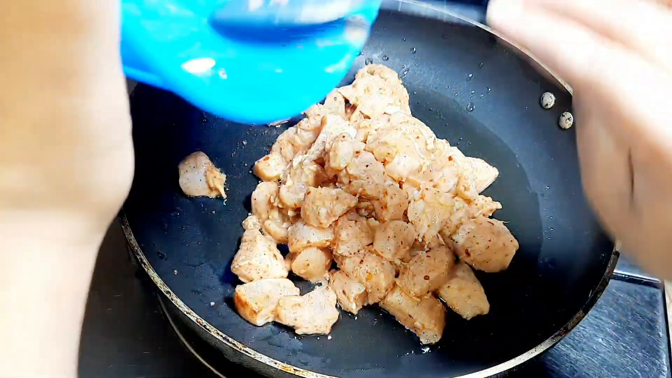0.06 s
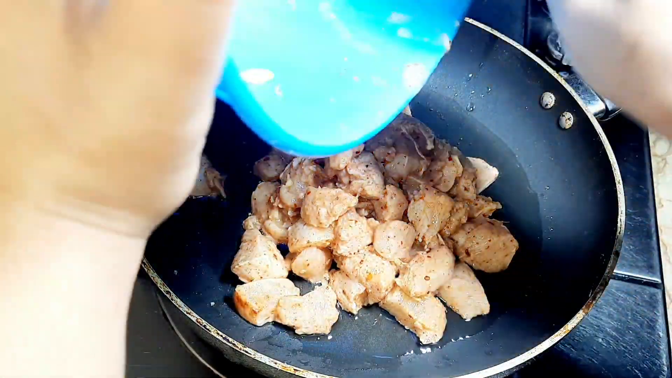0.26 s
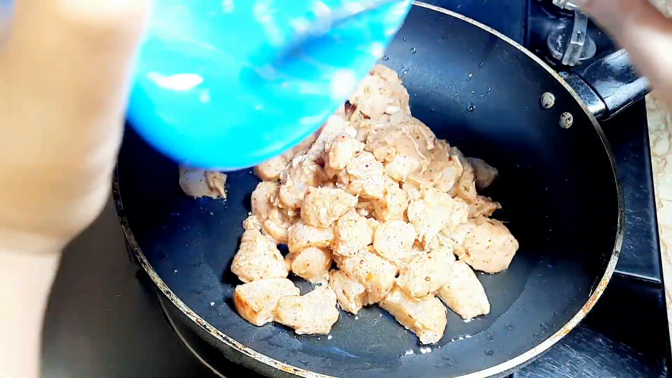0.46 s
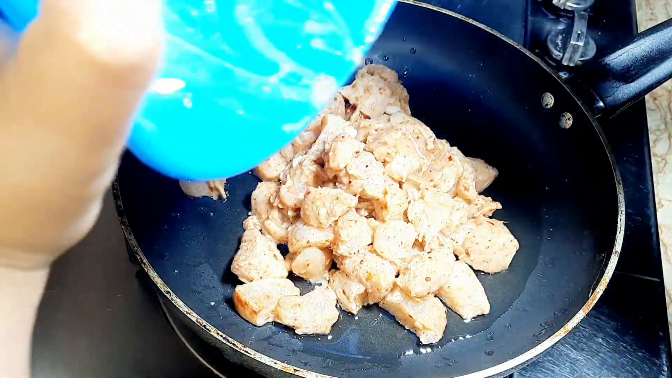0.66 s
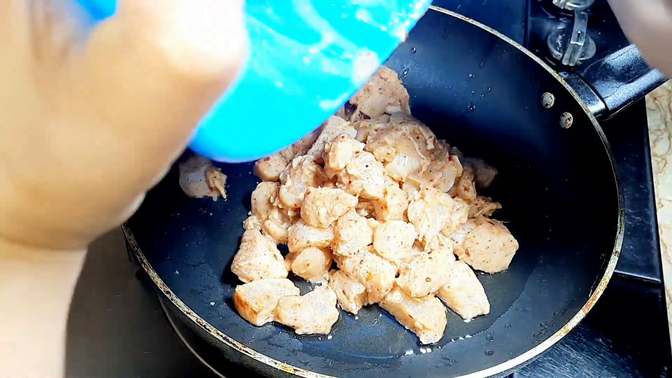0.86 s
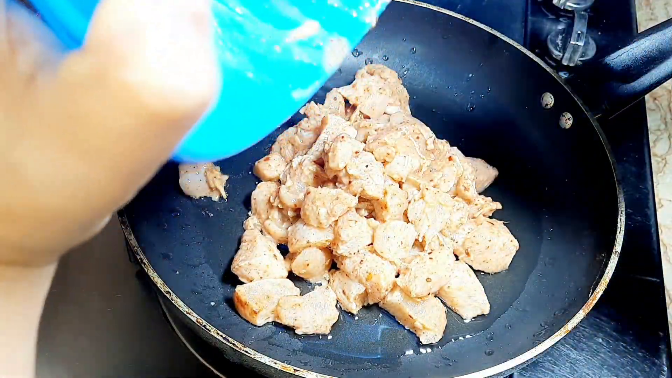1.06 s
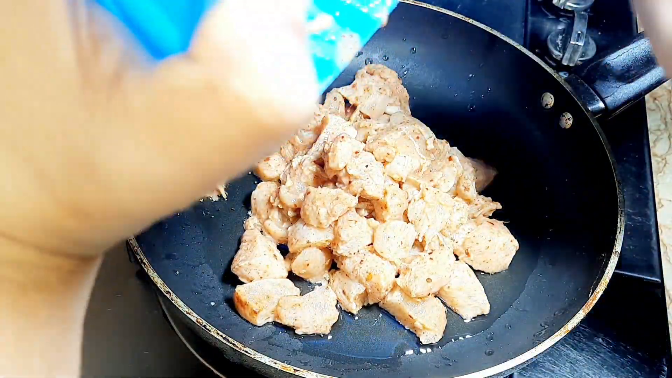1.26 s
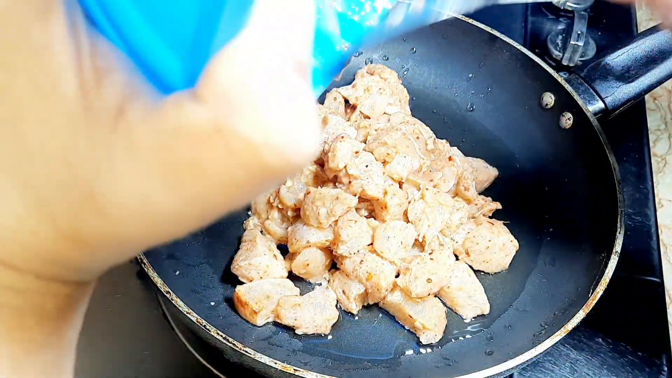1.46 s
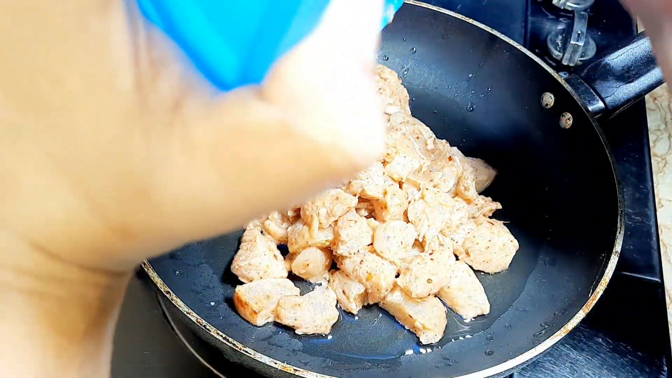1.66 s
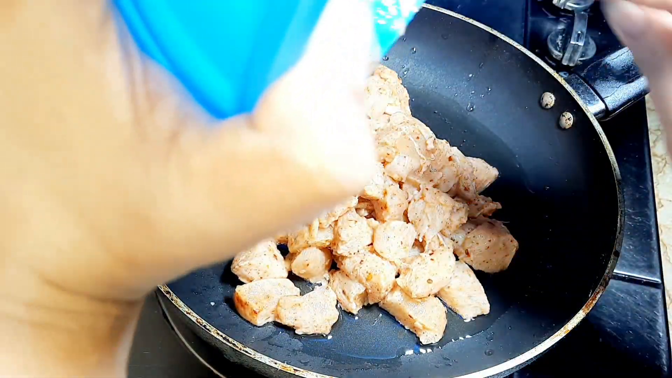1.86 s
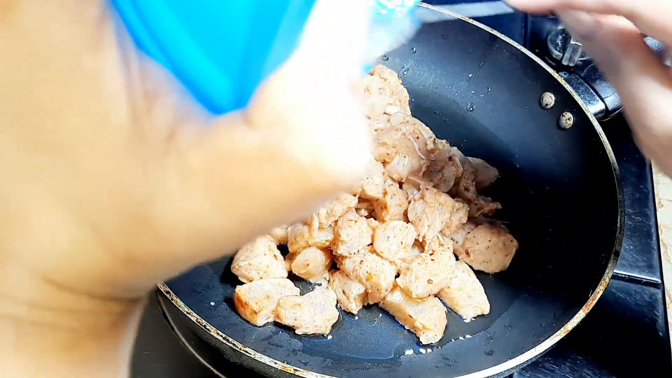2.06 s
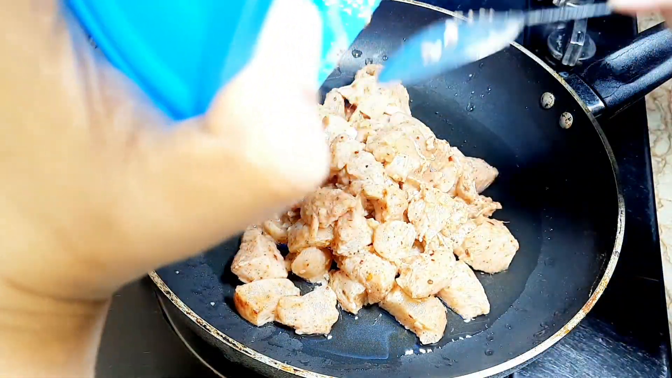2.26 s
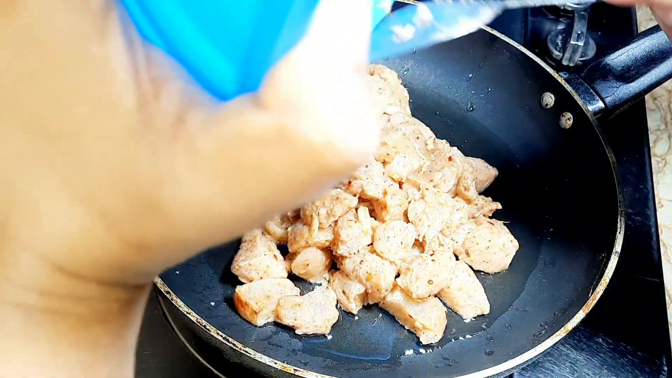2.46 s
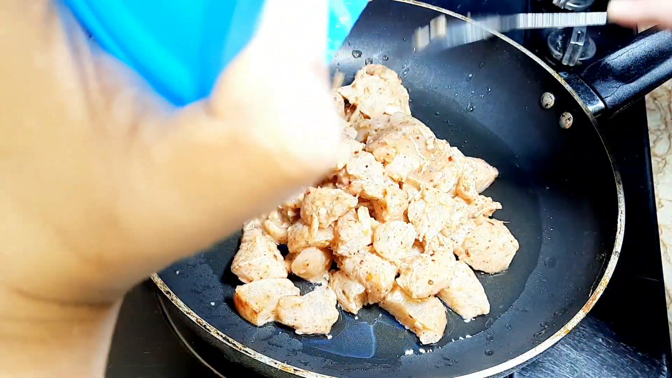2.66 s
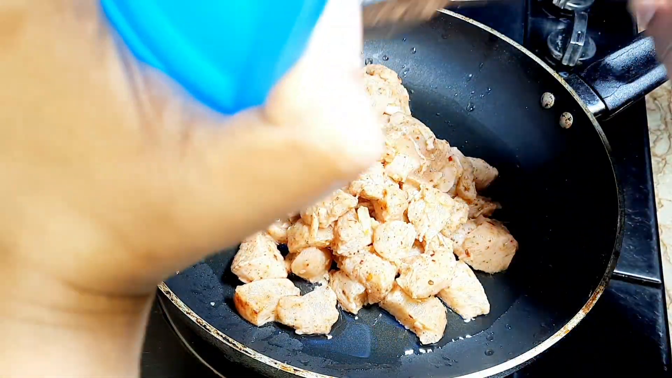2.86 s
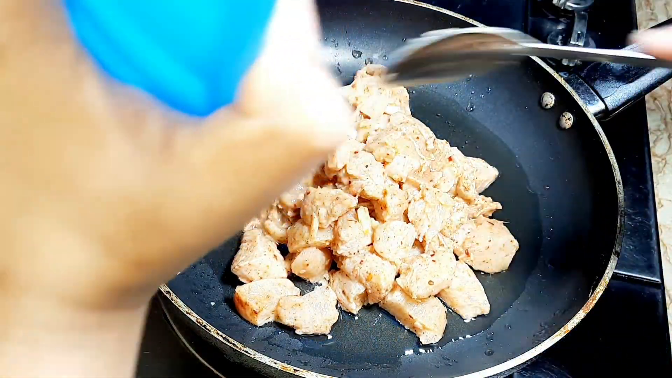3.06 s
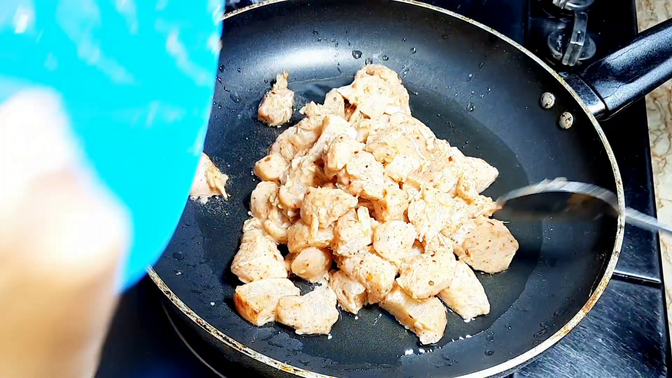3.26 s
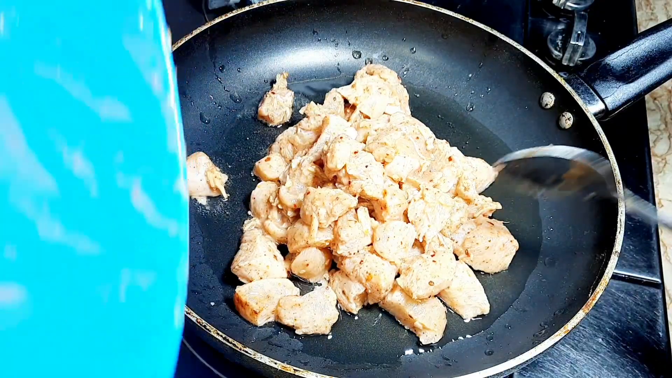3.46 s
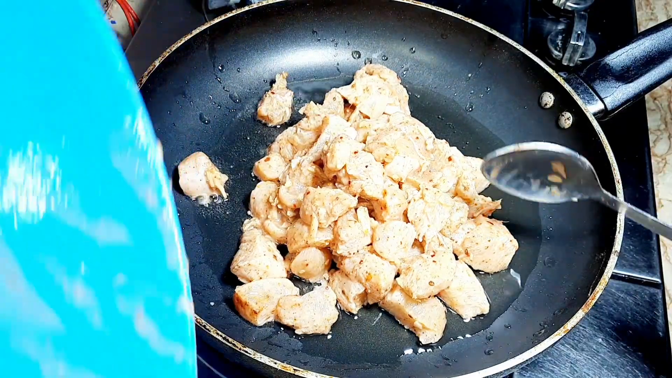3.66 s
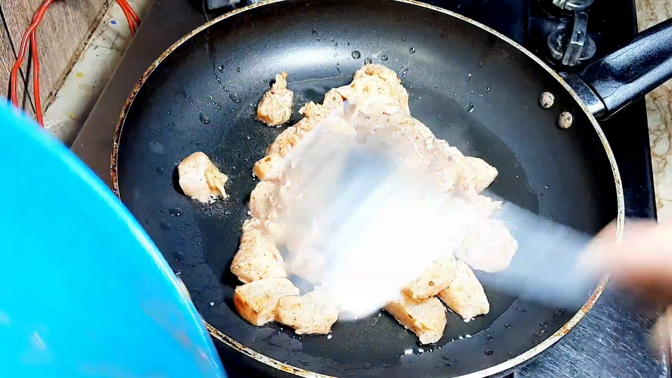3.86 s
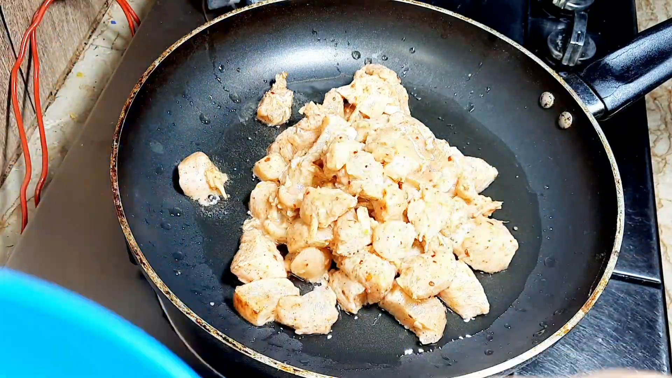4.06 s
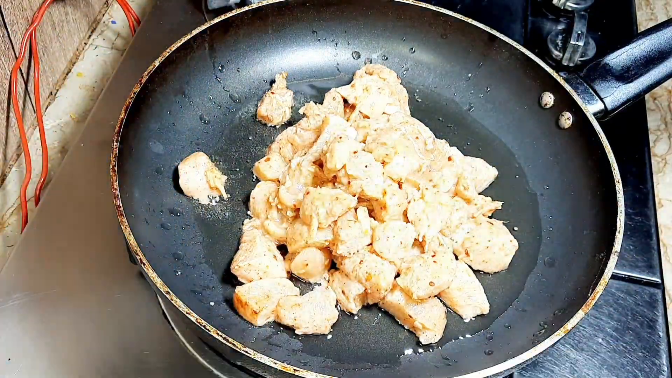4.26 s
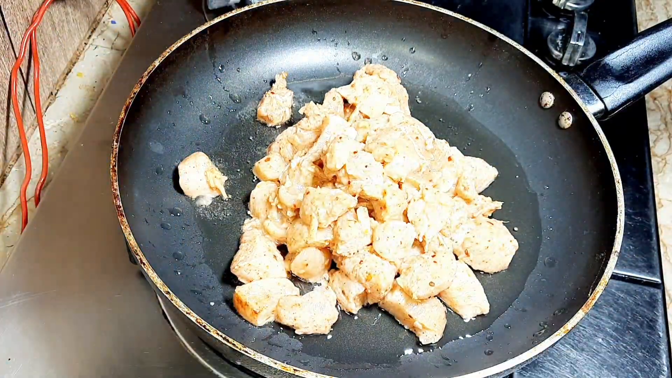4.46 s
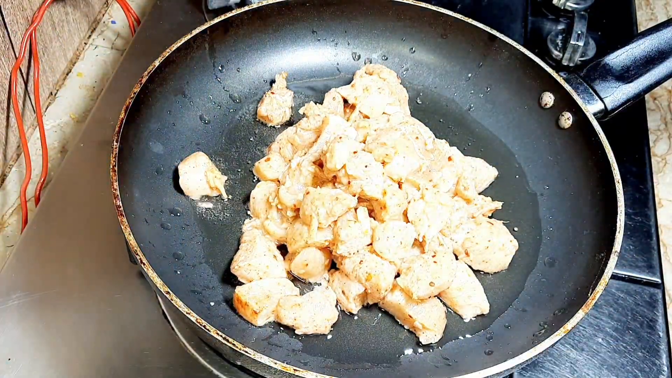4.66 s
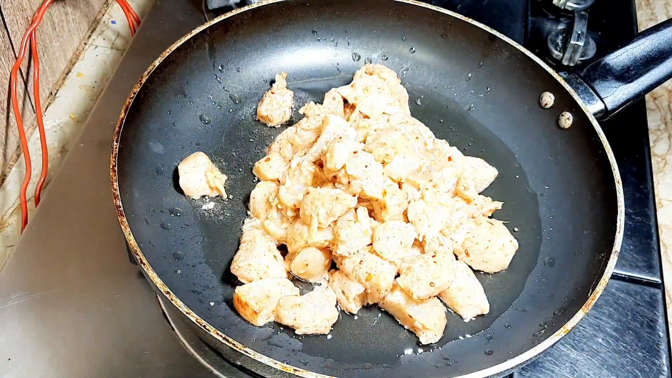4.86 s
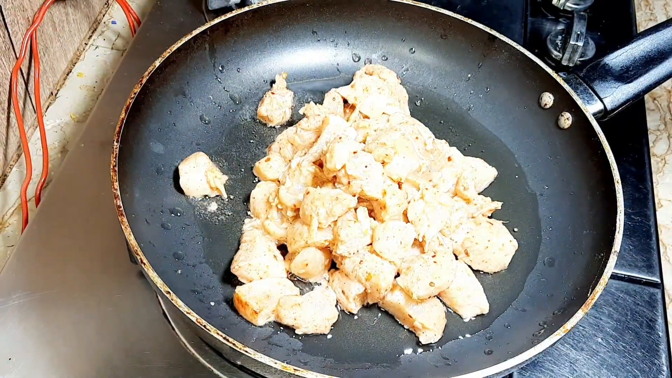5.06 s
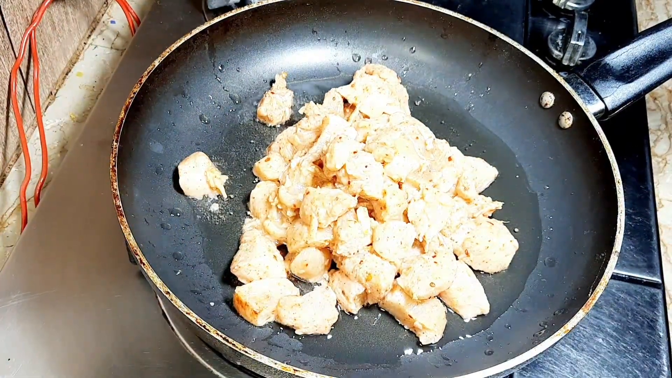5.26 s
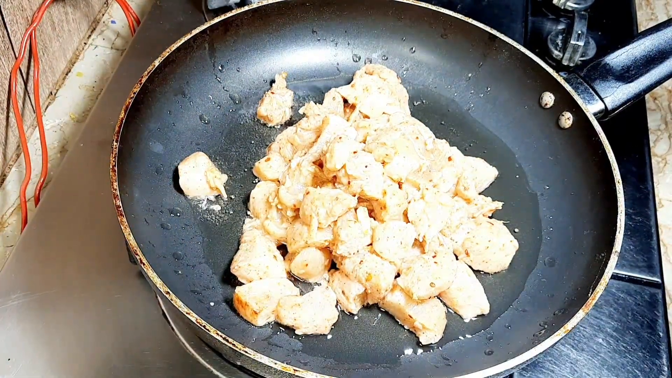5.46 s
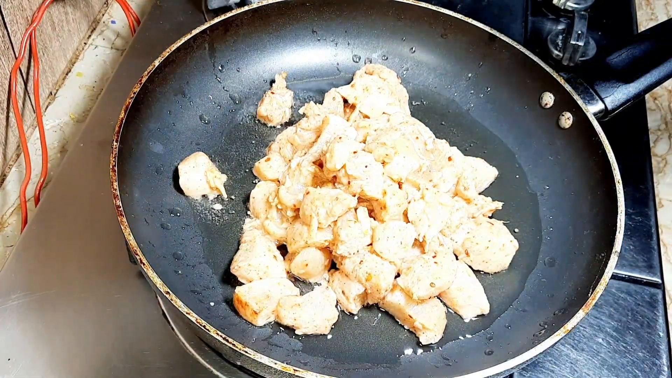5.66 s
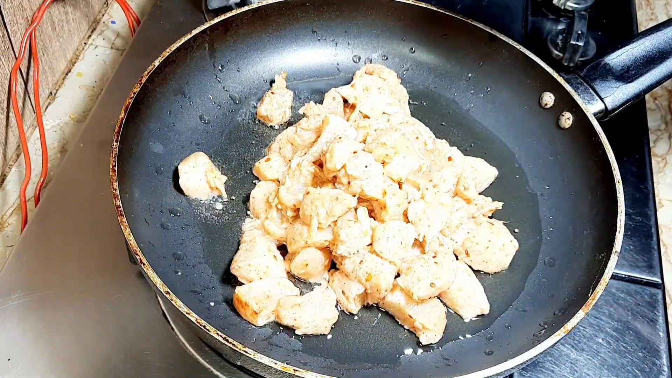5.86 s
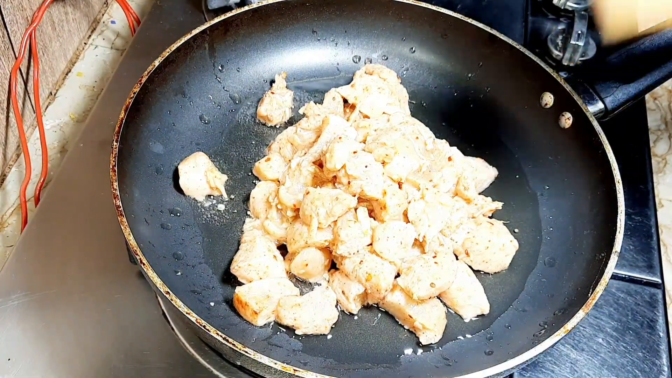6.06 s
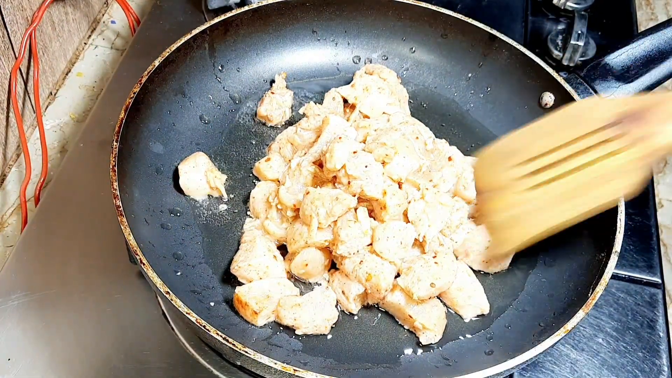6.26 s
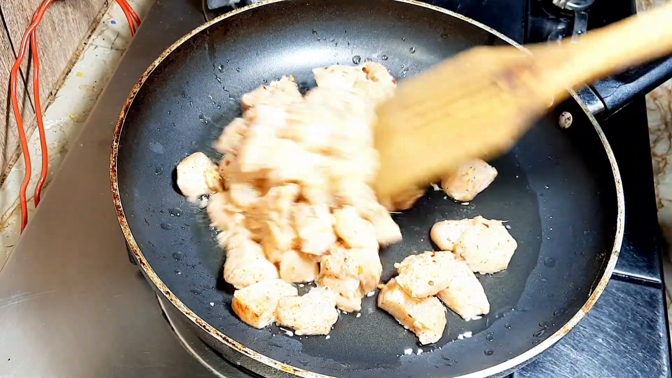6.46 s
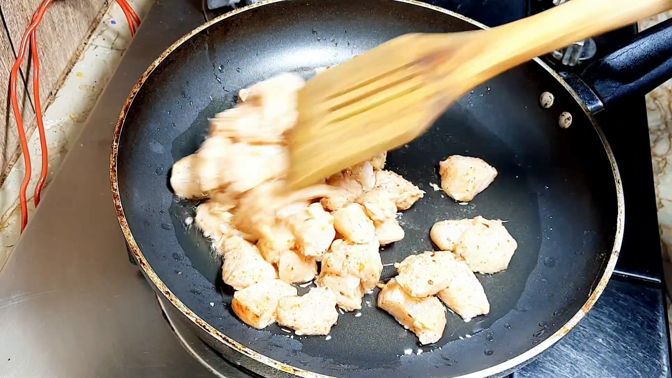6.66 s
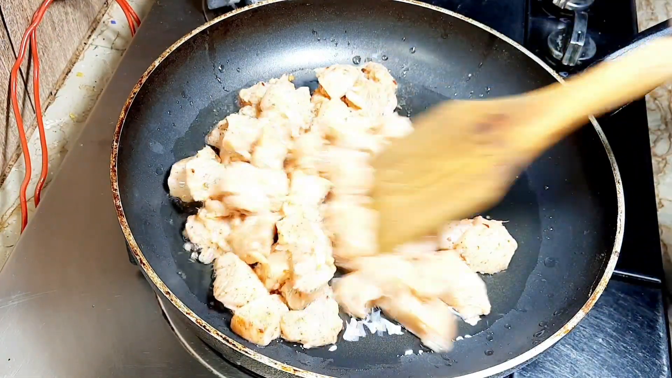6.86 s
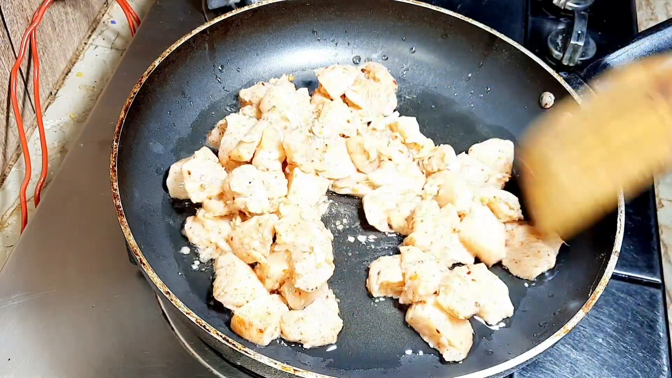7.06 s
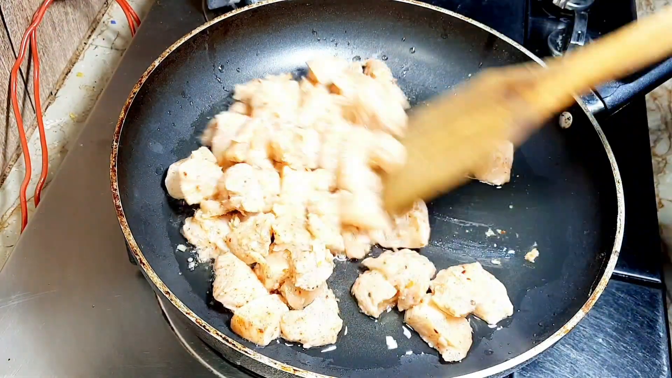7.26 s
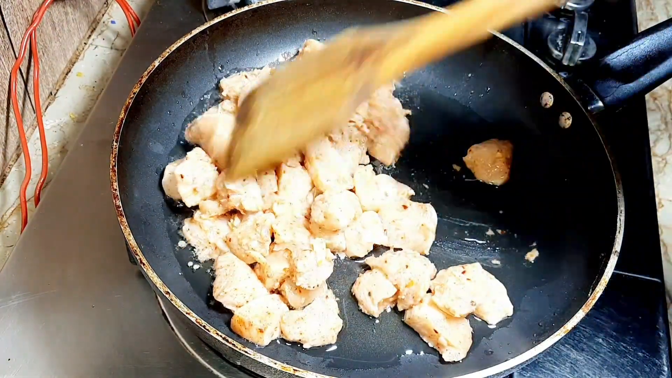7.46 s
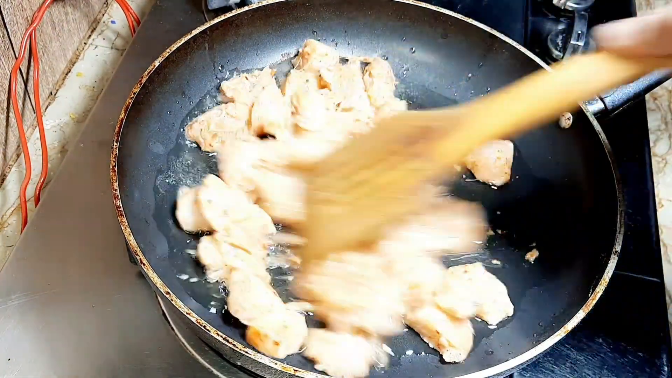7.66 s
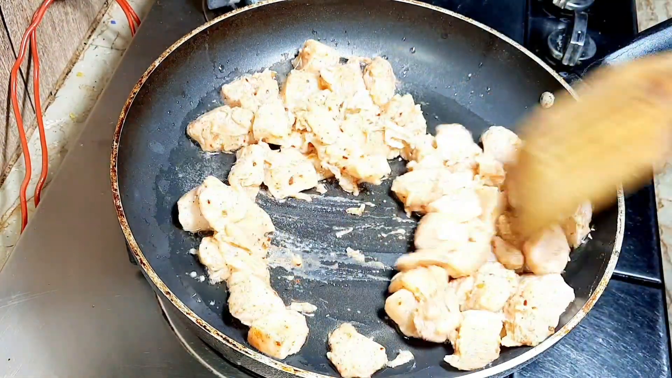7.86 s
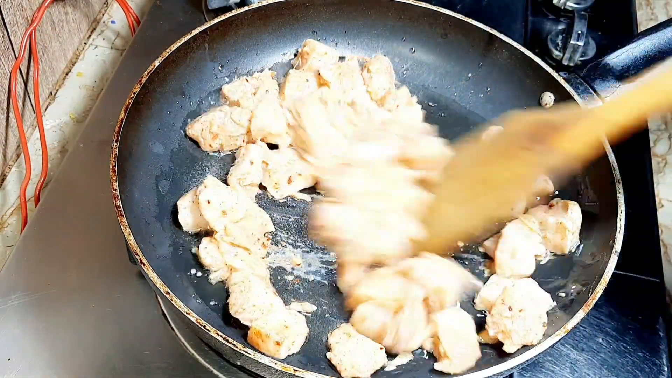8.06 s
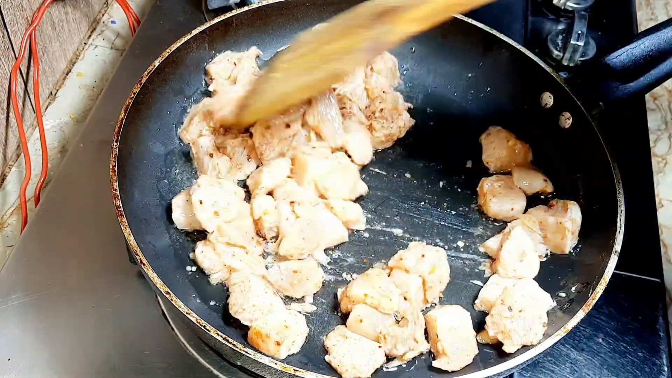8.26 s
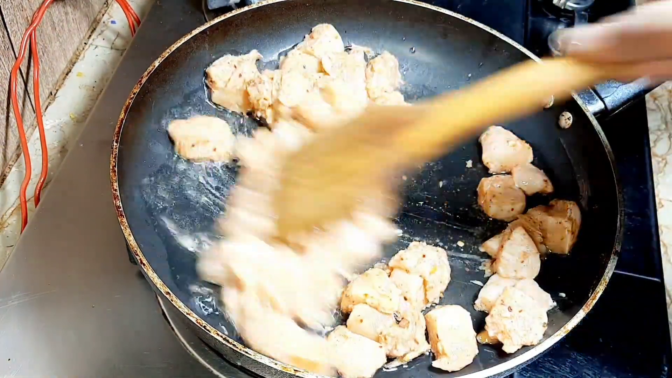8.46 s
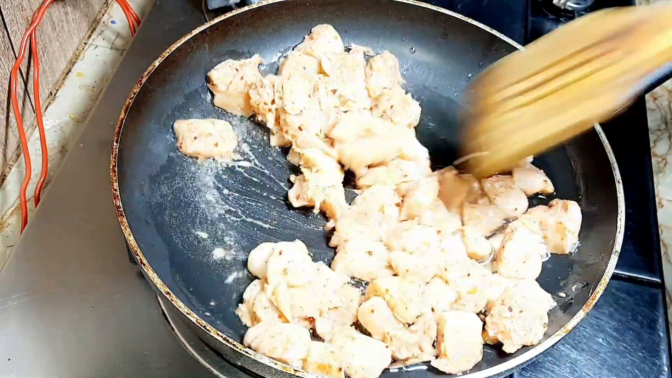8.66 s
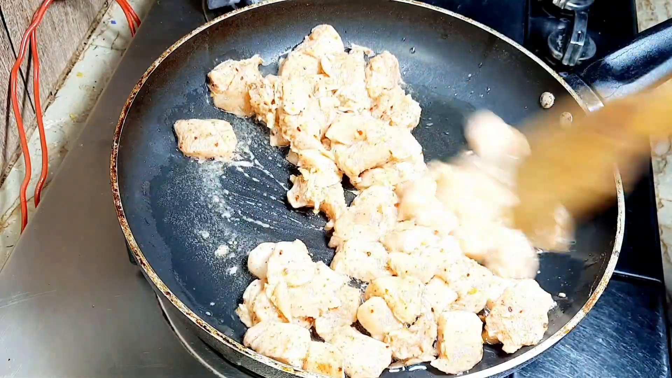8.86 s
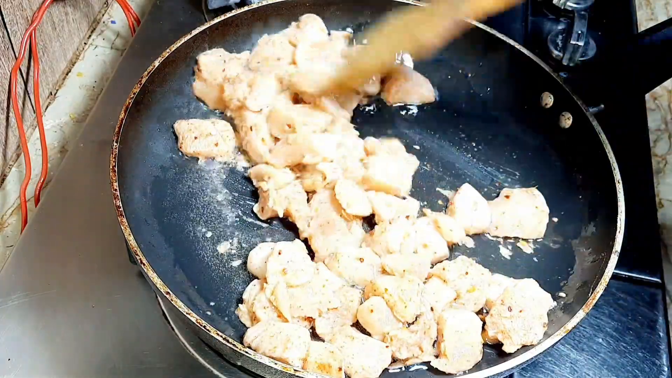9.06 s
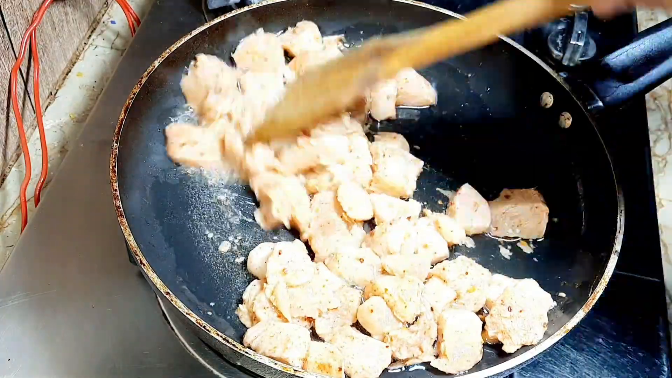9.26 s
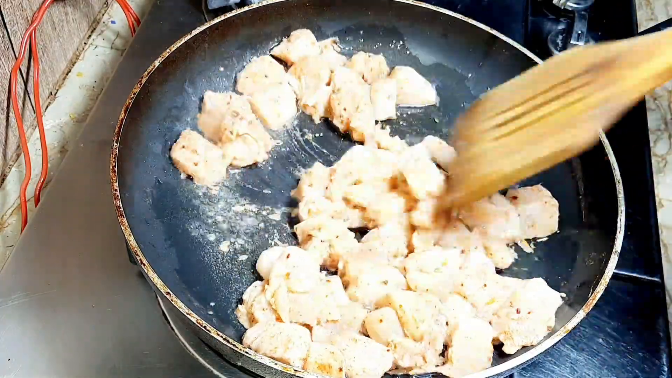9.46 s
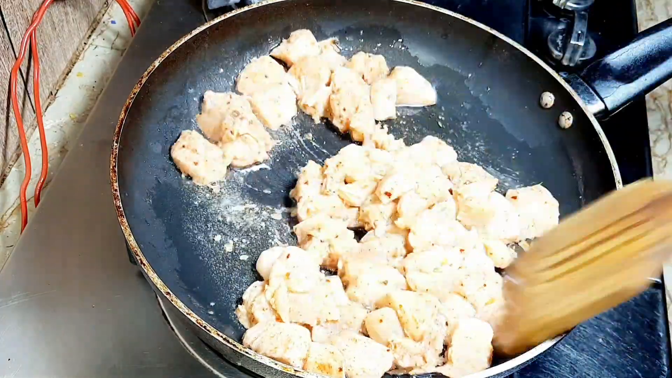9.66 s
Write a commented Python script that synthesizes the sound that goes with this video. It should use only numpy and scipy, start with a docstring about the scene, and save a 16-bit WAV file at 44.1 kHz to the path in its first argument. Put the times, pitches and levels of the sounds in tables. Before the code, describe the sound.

Close stereo pickup of a pan frying chicken in a small, lively kitchen, a fan humming underneath. First come hollow knocks of metal on a plastic bowl over faint fizz, next a quick run of clear metallic taps on the pan, then the spoon tinkling into the bowl and the bowl landing with a dull clack. Finally the sizzle surges in waves as wooden stirring begins, with faint dull bumps and many sharp oil pops.

```python
"""Chicken pieces start to fry in a pan: ringing steam bubbles in three sizes, topped by popping pockets of steam.
A steel spoon knocks a plastic bowl empty, raps the pan rim and drops into the bowl, which is set down; then a
wooden spatula stirs and the frying swells. The blows are decaying modes on a noisy rasp. A small hard-walled
kitchen rings through a noise tail; an extractor fan hums with mains tones and air noise.
Two unlike microphone ports follow, with slow gain control."""
import sys
import numpy as np
from scipy import signal
from scipy.fft import rfft, irfft
from scipy.io import wavfile

SR = 44100
rng = np.random.default_rng(int(sys.argv[2]) if len(sys.argv) > 2 else 0)


def materialize(psi):
    """Save the field psi as 16-bit PCM at rate SR to the path in sys.argv[1].

    A 1-D psi becomes a single channel; in a 2-D psi each row is a channel.
    """
    bounded = np.clip(np.atleast_2d(psi).T, -1, 1)
    quanta = np.round(bounded * 32767).astype(np.int16)
    wavfile.write(sys.argv[1], SR, quanta)


N = 428652
TIME = np.arange(N) / SR

# Swell of the frying, before the gain per bubble size, the room and the port gain:
# time_s, big_bubbles_db, finest_spray_db
FRY_SWELL = [(0.0, -36, -45.5), (0.75, -36.5, -44.5), (1.3, -34.5, -41.5), (2.7, -33, -40.5),
             (3.9, -34, -39.5), (4.3, -36.5, -43), (5.2, -37, -39.5), (5.7, -33.5, -37), (6.2, -33.5, -37),
             (6.73, -28.5, -36), (7.3, -30, -35), (7.8, -33, -33.5), (8.0, -32.5, -35), (8.3, -30, -31.5),
             (8.95, -31.5, -29.5), (9.4, -34.5, -27.5), (9.72, -36, -28.5)]


def frying():
    """Three sizes of bubble, surging together: big bubbles, middle fizz and fine spray."""
    # bubble sizes: lowest_hz, highest_hz, grains_per_s, cycles_rung, size_spread_db, clumping_db
    bubble_kinds = [(801, 3500, 3200, 13.2, 3.0, 1), (3635, 8520, 7000, 15.8, 2, 2),
                    (8300, 9800, 11000, 2.9, 3.5, 4.5)]
    # level of each bubble size: gain_db
    size_gains = [-0.5, 0.75, 2.5]
    s, big_db, fine_db = np.transpose(FRY_SWELL)
    fizz_db = big_db + 0.59 * (fine_db - big_db) + 1   # lies between the two, lifted 1 dB
    surge = drift(14.7)
    layers = 0
    for kind, db, size_db in zip(bubble_kinds, (big_db, fizz_db, fine_db), size_gains):
        gain = from_db(np.interp(TIME, s, db) + size_db)
        layers = layers + gain * grains(*kind, surge)
    return layers


def grains(low_hz, high_hz, per_s, cycles, spread_db, clump_db, surge, lag=6.0, lag_spread=4.0, count=12):
    """Steam bubbles burst at random all over the pan, in clumps; each has its own lag (samples) to the right port."""
    # tone of the frying: frequency_hz, density_db_per_hz
    fry_colour = [(290, -43), (500, -5), (649, 3.5), (698, -5.5), (761, 4), (855, -6), (1050, -6),
                  (1230, -2), (2100, 4.5), (3980, -10.5), (6610, -12.5), (9490, -11.5), (10500, -7),
                  (13400, -2), (16000, -4.5)]
    at = np.flatnonzero(rng.random(N) < per_s / SR)
    swell = from_db(clump_db * (0.56 * surge + 0.42 * drift(41)))
    sizes = from_db(spread_db * np.minimum(rng.exponential(1, N), 6))[at]
    sizes = sizes * rng.choice([-1, 1], N)[at] * swell[at]
    lags = np.round(lag + lag_spread * rng.standard_normal(N)[at]).astype(int)
    late = np.clip(at + lags, 0, N - 1)
    dealt = rng.integers(0, count, N)[at]   # each burst goes to one of the pitches
    out = 0
    for k, hz in enumerate(np.geomspace(low_hz, high_hz, 2 * count + 1)[1::2]):
        clicks, mine = np.zeros((2, N)), dealt == k
        nest = sizes[mine] * from_db(clump_db * drift(23))[at[mine]]   # like bubbles come in nests
        clicks[0, at[mine]] = nest
        np.add.at(clicks[1], late[mine], nest)
        out = out + hz * ring(clicks, hz, cycles)   # small bubbles die sooner: evened to a flat spectrum
    return rms_one(colour(out, fry_colour))


def ring(clicks, hz, cycles):
    """A damped resonance: clicks set a bubble ringing, down 60 dB after so many cycles."""
    radius = from_db(-60 * hz / (cycles * SR))
    angle = 2 * np.pi * hz / SR
    return signal.lfilter([1, 0, -1], [1, -2 * radius * np.cos(angle), radius ** 2], clicks + 1e-18) / 2


def loud_pops():
    """The loudest pockets of steam explode in the oil at set moments."""
    # explosions, before lean, room and port gain: start_s, level_db, pitch_hz
    pop_rows = [(1.8456, -12, 11200), (2.1188, -12, 6200), (2.485, -7, 13400), (2.88, 5.5, 14400),
                (3.7343, -9, 7540), (3.811, -8, 14000), (4.59, -10, 4460), (4.6014, -14, 5770),
                (4.9645, -5, 12500), (5.5547, -9, 10900), (5.7283, -4.5, 13600), (6.1974, -5, 11600),
                (6.266, -6, 11500), (6.3843, -9.5, 5700), (6.4586, -2.5, 11500), (6.6417, -5, 3200),
                (6.6696, -11, 6430), (6.8598, -11, 2100), (6.8694, -11, 5300), (7.0802, -10, 4360),
                (7.5353, -8, 3890), (7.6118, -6, 3500), (7.7373, -4, 4700), (7.9624, -8, 7000),
                (8.0171, -4, 7200), (8.037, 0, 14100), (8.0773, -6, 3200), (8.1697, -7.5, 6090),
                (8.283, -7.5, 6340), (8.2427, -10, 2860), (8.3228, -10, 2520), (8.3857, -11, 2650),
                (8.428, 2, 12800), (8.527, -11.5, 2620), (8.591, -1.5, 12600), (8.9025, -7, 6700),
                (9.1954, -4, 13200), (9.3665, 2, 13200), (9.564, -9, 2730)]
    return pops(pop_rows)


def chance_pops(count=300, per_s=24, over_spray_db=18.5, spread_db=3):
    """Lesser pops come by chance, up to per_s at the peak of the spray and more rarely when it is weak."""
    # pitch range of the lesser pops: lowest_hz, highest_hz
    low_hz, high_hz = (3200, 14000)
    when, luck, size, pitch = rng.random((count, 4)).T
    start_s = when * N / SR
    s, _, fine_db = np.transpose(FRY_SWELL)
    spray_db = np.interp(start_s, s, fine_db)
    kept = luck * count * SR / N < per_s * from_db(spray_db - fine_db.max())
    db = spray_db + over_spray_db - spread_db * np.log(1 - 0.86 * size)
    hz = low_hz * (high_hz / low_hz) ** pitch
    return pops(np.transpose([start_s, db, hz])[kept])


def pops(table, lag=6):
    """A pocket of steam explodes: a short ring on a bright snap, then a fizzing spray; lag in samples."""
    # big pockets ring, small ones snap: pitch_hz, cycles_rung, snap_share (gain), spray_share (gain)
    pop_sizes = [(2820, 20, .02, .032), (3200, 10.1, 0.25, 0.11)]
    out, t = np.zeros((2, N + SR)), np.arange(int(.03 * SR)) / SR
    click = (t == 0) * 1.0
    size_hz, *traits = np.transpose(pop_sizes)
    for s, db, hz in table:
        cycles, snap_share, spray_share = (np.interp(hz, size_hz, trait) for trait in traits)
        snap = ring(click, hz, cycles) + snap_share * ring(click, 11000, 1.5)
        hiss = ring(rng.standard_normal((2, len(t))), hz, 2.5)
        spray = spray_share * hiss * from_db(-60 * t / .035)
        pan_db = 3 + 2.5 * rng.standard_normal()   # leans left, with scatter
        for ch, side in enumerate((1, -1)):
            i = round(s * SR) + ch * lag
            out[ch, i:i + len(t)] += (snap + spray[ch]) * from_db(db + side * pan_db / 2)
    return out[:, :N]


def bowl():
    """The plastic bowl is knocked by the spoon, scraped, has the spoon dropped into it and is set down."""
    # The next three tables share their columns; levels come before panning, room and port gain:
    # start_s, level_db, main_mode_hz, then tilt_db against that mode at three higher frequencies
    bowl_blows = [(0.231, -8, 384, -20, -9, -23), (0.302, -19.5, 338, -7.5, -11, -11),
                  (0.769, -6, 332, -17, -5, -15), (0.785, -13, 343, -33, -4, -14),
                  (1.142, -10, 351, -13.5, -5.5, -6.5), (1.56, -19, 347, -2, 0.5, 1),
                  (1.94, -9, 348, -14.5, -4, -10), (2.406, -24.5, 364, 9, 19, 2.5),
                  (2.779, -18.5, 332, 9, 11.5, -6.5), (4.026, -6, 344, -13, -6, -14),
                  (4.837, -11.5, 364.5, 0, -8, -12.5), (5.105, -25, 257, 3.5, -17, -12),
                  (5.135, -31.5, 314, 0, 3, 5)]
    # the loose spoon lands in the bowl and tinkles
    spoon_drops = [(3.9995, -14, 305, 1, 12.4, -8), (4.097, -12.5, 415, 2.5, 4, -11)]
    # the spoon or the bowl slides on after a blow
    scrapes = [(0.269, -18, 363, -20, 6.5, -1), (0.829, -17.5, 289, -5, 2, 3.5),
               (2.414, -23, 307, -8, 14, -9), (2.816, -15, 332, 6.5, -3, -3), (2.859, -23, 340, -4, 8, -1),
               (4.037, -3.5, 341.6, -3.5, -11, -20), (4.111, -13.5, 320, -8, 3, -9),
               (4.149, -17, 340, -1, -7, -5), (4.867, -15.5, 340, 2, 0.5, 0.5)]
    # other modes, the three highest being the spoon's own: rest_hz, level_db, t60_s
    bowl_modes = [(145, -18, .15), (175, -18, .1), (270, -10, .08), (470, -4, .07), (570, -5, .07),
                  (670, -6, .07), (780, -8, .06), (1230, -9, .03), (1500, -9, .03), (1800, -5, .05),
                  (1950, -3, .06), (2150, -6, .04), (2450, -10, .03), (3300, -10, .02), (4650, -11, .02),
                  (6100, -11, .03), (7200, -12, .1), (11400, -9, .12), (12900, -13, .1)]
    main_t60 = .13
    out = blows(bowl_blows, bowl_modes, main_t60, rasp_db=12.5, rasp_t60=.038, fall_db=-12.0,
                bend=0.036, lag_s=0.00025, rise_s=0.00035)
    out += blows(spoon_drops, bowl_modes, main_t60, rasp_db=12.4, rasp_t60=.038, fall_db=4.4,
                 bend=0.026, lag_s=0.00022, rise_s=0.00035)
    out += blows(scrapes, bowl_modes, main_t60, rasp_db=4.4, rasp_t60=.26, fall_db=-27.0,
                 bend=0.033, lag_s=0.00017, rise_s=0.008)
    return out


def pan():
    """The pan rings longer than the bowl, brightly under the spoon and dully under the wooden spatula."""
    # spoon on the rim: start_s, level_db, main_mode_hz, then tilt_db at three higher frequencies
    rim_raps = [(3.241, -22, 308, -2, -5, -5), (3.363, -6.5, 304.4, -5, -4.5, -7.5),
                (3.503, -8.5, 297, -6.5, -8, 0), (3.618, -10.5, 304, 1.5, -5.5, 2.5)]
    # soft wood wakes mainly the low modes: start_s, level_db, main_mode_hz, tilt_db at the first frequency
    spatula_blows = [(6.388, -36.5, 341, -11.5), (8.434, -34, 259, 7), (9.627, -23.5, 312, 3.5)]
    # other modes: rest_hz, level_db, t60_s
    pan_modes = [(140, -21, .2), (272, -9, .25), (600, -8, .1), (675, -5, .15), (765, -6, .12),
                 (1390, -9, .06), (2040, -9, .08), (2690, -9, .08), (3040, -10, .08), (3310, -11, .08),
                 (4320, -12, .08), (5070, -6, .11), (5340, -10, .07), (5560, -10, .08), (6010, -12, .05),
                 (6990, -6, .09), (7570, -10, .06), (8500, -3, .14), (10000, -7, .1), (12400, -9, .07)]
    main_t60 = .37
    out = blows(rim_raps, pan_modes, main_t60, rasp_db=17.6, rasp_t60=.038, fall_db=-9.0,
                bend=0.0045, lag_s=.0001, rise_s=0.00017)
    out += blows(spatula_blows, pan_modes, main_t60, rasp_db=12.6, rasp_t60=.038, fall_db=-13.0,
                 bend=0.0031, lag_s=.0001, rise_s=0.00047)
    return out


def blows(table, modes, main_t60, rasp_db, rasp_t60, fall_db, bend, lag_s, rise_s):
    """Each blow rings the main low mode and the other ones, bent in pitch by the grip, on a noisy rasp."""
    # where the tilt columns of a blow apply: frequency_hz
    tilt_hz = [700, 2000, 5500]
    # the hands work from right to left: time_s, left_over_right_db
    hand_path = [(0.2, -4), (0.8, -1), (2.8, 0), (4, 3.5), (5.1, 3)]
    # the rasp is weak between the low and the middle modes: frequency_hz, gain_db
    rasp_gap = [(800, 0.5), (1050, -9), (1500, -1.5), (1700, 0)]
    out, t = np.zeros((2, N + SR)), np.arange(int(.4 * SR)) / SR
    rest_hz, mode_db, t60 = np.transpose(modes)[:, :, None]
    heard = np.clip(t - np.array([[[0]], [[lag_s]]]), 0, None)   # the right port is farther
    port_time = heard[:, 0]
    for s, db, main_hz, *tilt_db in table:
        hardness = [(350, 0), *zip(tilt_hz, tilt_db)]
        top_hz, top_db = hardness[-1]
        hardness.append((2.54 * top_hz, top_db + fall_db))   # slope above the last column

        level, turn, shift = rng.standard_normal((3, 2, len(modes), 1))
        hz = rest_hz * (1 + bend * shift[0] * (rest_hz < 6500))
        strength = from_db(mode_db + at_hz(hardness, hz) + 3.9 * level - 60 * heard / t60)
        turn = turn * np.clip(hz / 1500, 0, 2)   # short waves radiate in lobes
        sound = np.sum(strength * np.sin(2 * np.pi * hz * heard + turn), axis=1) * (port_time > 0)

        # a round body splits its main low mode in two
        twins = np.sin(2 * np.pi * main_hz * port_time)
        twins += 0.16 * np.sin(2 * np.pi * 1.07 * main_hz * port_time)
        sound += twins * from_db(-60 * port_time / main_t60)

        dying = from_db(-60 * t / rasp_t60) + 0.8 * from_db(-60 * t / 0.0085)   # the first contact cracks
        rasp = alike_noise(len(t)) * from_db(rasp_db) * dying
        tilt = [(f, rel_db - 10 * np.log10(f / 350)) for f, rel_db in hardness]   # band level to level per Hz
        sound += colour(colour(rasp, [(60, -40), (180, -16), *tilt]), rasp_gap)

        pan_db = np.interp(s, *np.transpose(hand_path))
        port_gain = from_db(db + np.array([[.5], [-.5]]) * pan_db)
        i = round(s * SR)
        out[:, i:i + len(t)] += sound * (1 - np.exp(-t / rise_s)) * port_gain
    return out[:, :N]


def kitchen(x):
    """Reverberation of hard walls: a noise tail that dies band by band."""
    # decay of the room: frequency_hz, t60_s
    room_decay = [(150, 0.5), (400, 0.5), (1500, 0.45), (4000, 0.22), (12000, 0.19)]
    t, tail = np.arange(int(.6 * SR)) / SR, 0
    edges = 60 * 2.0 ** np.arange(9)   # octave bands
    white = alike_noise(len(t))
    for low, high in zip(edges, np.append(edges[1:], 19000)):
        band = signal.sosfilt(signal.butter(2, [low, high], "band", fs=SR, output="sos"), white)
        tail = tail + band * from_db(-60 * t / at_hz(room_decay, low * np.sqrt(2)))
    tail = tail * (1 - np.exp(-t / 0.0036)) / np.sqrt(np.sum(tail ** 2) / 2)   # reflections build up
    return signal.oaconvolve(x, tail, axes=1)[:, :N]


def fan():
    """The extractor: mains tones that waver slightly in level, over steady air noise."""
    # mains tones, before port gain: frequency_hz, rms_level_db
    mains_tones = [(49.7, -47.5), (99.4, -44.5), (149.1, -56)]
    # tone of the air noise: frequency_hz, density_db_per_hz
    air_colour = [(25, -51), (45, -22), (60, -9), (82, -0.5), (103, -7), (128, -9.5), (145, 0.5),
                  (165, -6.5), (215, -18), (241, -12.5), (300, -7.5), (529, -18), (760, -15.5), (1060, -16),
                  (1300, -17), (1800, -27)]
    tones = 0
    for hz, db in mains_tones:
        amplitude = np.sqrt(2) * from_db(db + .5 * drift(1.3))
        tones = tones + amplitude * np.sin(2 * np.pi * (hz * TIME + rng.random()))
    air = rms_one(colour(alike_noise(N), air_colour, size=8192))
    return tones + from_db(-41) * air


def alike_noise(length):
    """Stereo white noise that is alike in both ports in the bass: a shared mid plus an opposed side."""
    # left-right likeness: frequency_hz, correlation (0 to 1)
    port_likeness = [(100, 1), (300, 0.68), (700, 0.7), (1300, 0.04)]
    mid, side = rng.standard_normal((2, length))
    side_share = [(f, 10 * np.log10((1 - min(c, .99)) / (1 + c))) for f, c in port_likeness]
    return mid + colour(side, side_share) * [[1], [-1]]


def drift(rate):
    """Slow chance of rms 1: noise at every 40th sample through a double one-pole low-pass at rate (Hz)."""
    r = np.exp(-80 * np.pi * rate / SR)
    noise = rng.standard_normal(N // 40 + 2002)
    slow = signal.lfilter([1], [1, -2 * r, r * r], noise)[2000:]   # skip the settling
    return np.interp(np.arange(N) / 40, np.arange(len(slow)), rms_one(slow))


def colour(x, spectrum, size=2048):
    """Causal (minimum-phase) filter with the given (Hz, dB) response, by folding its cepstrum."""
    log_gain = np.log(from_db(at_hz(spectrum, np.fft.rfftfreq(size, 1 / SR) + 1)))
    cepstrum = irfft(log_gain)
    cepstrum[1:size // 2] *= 2
    cepstrum[size // 2 + 1:] = 0
    taps = irfft(np.exp(rfft(cepstrum)))
    taps = taps.reshape((1,) * (x.ndim - 1) + (-1,))
    return signal.oaconvolve(x, taps, axes=-1)[..., :x.shape[-1]]


def at_hz(points, hz):
    """Read a (Hz, value) table on a log-frequency axis."""
    table_hz, values = np.transpose(points)
    return np.interp(np.log(hz), np.log(table_hz), values)


def from_db(db):
    """Gain of a level in dB."""
    return 10 ** (np.asarray(db) / 20)


def rms_one(x):
    """Scale to rms 1."""
    return x / np.sqrt(np.mean(x ** 2) + 1e-20)


def scene():
    """Frying and blows sound directly and set the room ringing; the fan is added without reverberation."""
    fry = frying() + loud_pops() + chance_pops()
    knocks = bowl() + pan()
    bass_cut = signal.butter(3, 130, "high", fs=SR, output="sos")   # the knocks carry no deep bass
    knocks = signal.sosfilt(bass_cut, knocks)
    room = kitchen(from_db(-4.0) * fry + from_db(-4.5) * knocks)
    return fry + knocks + room + fan()


def record(dry, knee_db=-26.5, slope=0.26, release_db_per_s=4.0, start_db=-11.0, makeup_db=5.0):
    """Port colour, gain control that ducks after loud blows and creeps back, bass cut, clipping, top cut."""
    # right port against left port: frequency_hz, gain_db
    right_port = [(60, -3), (400, 0), (750, 0.5), (1700, -3), (2600, -1), (4000, 0.5), (6000, 1.5),
                  (7200, -0.5), (8500, -12), (9500, -38), (11500, -7.5), (13000, -14), (15500, 2)]
    x = np.array([dry[0], colour(dry[1], right_port)])
    power = signal.lfilter([.001], [1, -.999], np.mean(x ** 2, axis=0))
    level_db = 10 * np.log10(power + 1e-12)
    level_db[0] = start_db   # a blow shortly before has left the gain low
    released_db = release_db_per_s * TIME
    held_db = np.maximum.accumulate(level_db + released_db) - released_db   # peak hold that sinks steadily
    x = x * from_db(makeup_db - slope * np.clip(held_db - knee_db, 0, None))
    x = signal.sosfilt(signal.butter(2, 40, "high", fs=SR, output="sos"), x)
    top_cut = signal.ellip(14, .2, 65, 15800, fs=SR, output="sos")
    return signal.sosfilt(top_cut, np.clip(x, -1, 1))


dry = scene()
out = record(dry)
materialize(out)
```